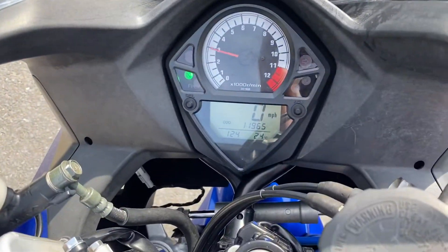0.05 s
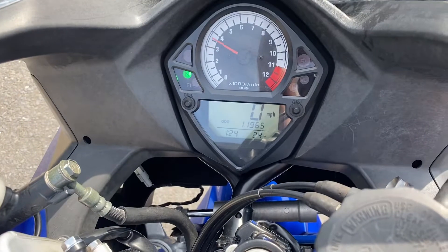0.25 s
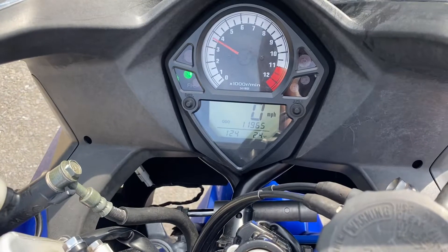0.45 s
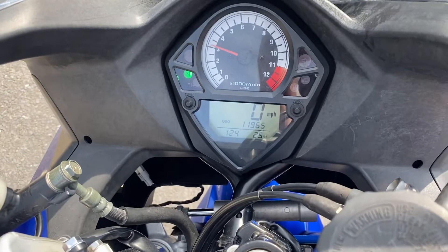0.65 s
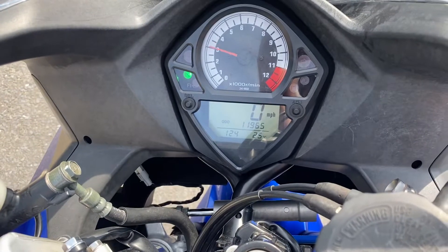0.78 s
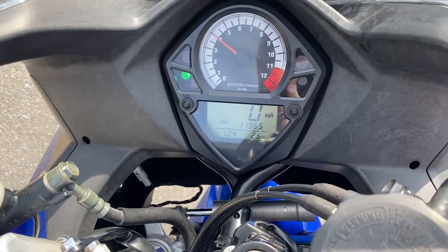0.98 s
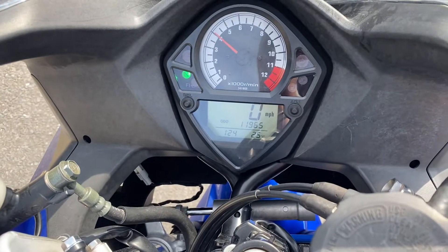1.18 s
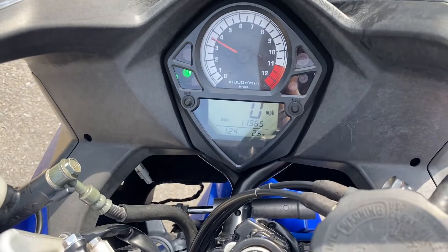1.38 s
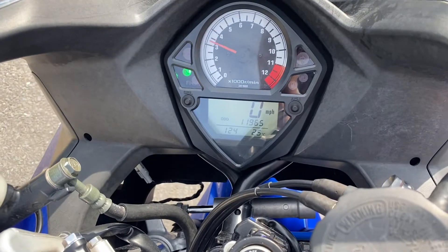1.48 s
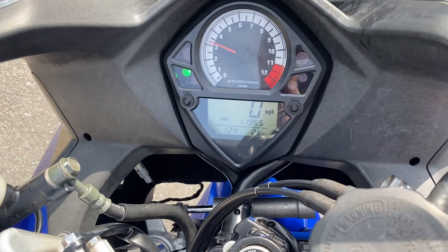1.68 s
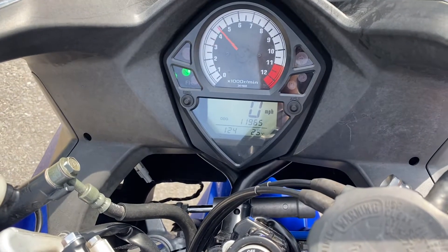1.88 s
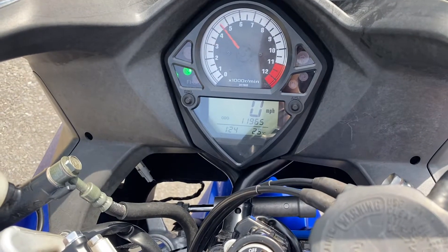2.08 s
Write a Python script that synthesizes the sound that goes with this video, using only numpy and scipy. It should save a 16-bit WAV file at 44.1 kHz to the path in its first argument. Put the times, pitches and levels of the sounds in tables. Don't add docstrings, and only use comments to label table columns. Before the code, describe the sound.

Rough twin-cylinder motorcycle revving in place, lumpy exhaust and honking intake rising and falling twice.

```python
import sys
import numpy as np
from scipy import signal
from scipy.fft import rfft, irfft, next_fast_len
from scipy.io import wavfile
from scipy.ndimage import uniform_filter1d

SR = 44100
rng = np.random.default_rng(int(sys.argv[2]) if len(sys.argv) > 2 else 0)


def generate_wav(sig):
    pcm = np.round(np.clip(np.atleast_2d(sig).T, -1, 1) * 32767).astype(np.int16)
    wavfile.write(sys.argv[1], SR, pcm)


def elevation(decibels):
    levels = np.asarray(decibels, float)
    return 10 ** (levels / 20)


N = 94506
CYCLES = 80


def evened(x):
    return x / np.sqrt(np.mean(x ** 2) + 1e-20)


def smoothed_twice(x, size):
    return uniform_filter1d(uniform_filter1d(x, size=size), size=size)


def read(points, hz):
    f, value = np.transpose(points)
    return np.interp(np.log(hz + 1), np.log(f + 1), value)


def control(rows, column=1):
    rows = np.array(rows)
    curve = np.interp(np.arange(N) / SR, rows[:, 0], rows[:, column])
    return uniform_filter1d(curve, size=600, mode="nearest")


# time in seconds, speed in engine cycles per second.
SPEED = [(0.0, 34.08), (0.08, 33.72), (0.2, 29.3), (0.32, 23.8), (0.43, 20.08), (0.54, 18.2), (0.64, 27.03),
         (0.76, 37.28), (0.83, 36.9), (1.03, 28.36), (1.2, 22.23), (1.3, 20.69), (1.41, 20.63),
         (1.52, 29.33), (1.64, 39.09), (1.73, 40.21), (1.84, 35.95), (2.14, 23.64)]


def engine_speed():
    return control(SPEED)


def turns():
    return np.cumsum(engine_speed()) / SR


def pull():
    full_pull = 12
    rise = np.gradient(engine_speed()) * SR
    return uniform_filter1d(np.clip(rise / full_pull, 0, 1), size=900)


# time in seconds, throttle roar in dB, intake honk in dB.
THROTTLE = [(0, -15, -21.5), (.07, -20, -28), (.22, -22.5, -43), (.45, -29, -50), (.535, -33, -34),
            (.555, -22.5, -38), (.62, -19, -22), (.7, -14, -15), (.78, -15, -20), (.86, -19, -14.5),
            (1.02, -22.5, -32.5), (1.2, -25.5, -45), (1.35, -26.5, -27.5), (1.405, -25.5, -39),
            (1.425, -25, -28), (1.52, -16, -21), (1.7, -13.5, -14.5), (1.82, -19, -15.5),
            (2.04, -25, -35.5)]
SHUT_DB, OPEN_DB = -27, -19


def roar_db():
    return control(THROTTLE)


def honk_db():
    return control(THROTTLE, column=2)


def throttle():
    return np.clip((roar_db() - SHUT_DB) / (OPEN_DB - SHUT_DB), 0, 1)


# pitch in Hz, likeness from 0 to 1.
SAME = [(120, .995), (700, .9), (1500, .45), (3500, .65), (5500, .3), (7500, .6), (8600, .985),
        (16000, .985)]
# pitch in Hz, phase in radians.
LEAD = [(200, .1), (900, .5), (6300, .05), (8550, -3.1), (10000, -6.3), (12100, -9.4), (14200, -12.6),
        (16100, -15.7)]
# pitch in Hz, left over right in dB.
TILT = [(60, -20), (250, -0.5), (1000, 5.5), (2000, 2.5), (4000, 4), (7000, 3.5), (8500, 1.3), (16000, 2)]


def ports(x, other, colour):
    patch_db, patch_top_hz = 2.5, 7000
    hz, _, left = signal.stft(x, SR, nperseg=512)
    stranger = signal.stft(other, SR, nperseg=512)[2]
    same = np.clip(read(SAME, hz), 0, 1)[:, None]
    lag = np.exp(-1j * read(LEAD, hz)) / elevation(read(TILT, hz))
    right = (same * left + np.sqrt(1 - same ** 2) * stranger) * lag[:, None]

    patch = uniform_filter1d(rng.standard_normal(left.shape), size=5, axis=0)
    patch = evened(uniform_filter1d(patch, size=8, axis=1))
    fade = 1 + (hz[:, None] / patch_top_hz) ** 2
    z = np.array([left, right]) * elevation(read(colour, hz)[:, None] + patch_db * patch / fade)
    return evened(signal.istft(z, SR, nperseg=512)[1][:, :N])


# pitch in Hz, level in dB per Hz.
ROAR = [(110, -13), (330, -5), (700, -7), (1600, -7.5), (2600, -19), (5200, -21), (9000, -31), (16000, -47)]
# pitch in Hz, level in dB per Hz.
IDLE = [(110, -10), (330, -5), (850, -9), (1700, -7), (3500, -13.5), (7500, -24), (11000, -49),
        (16000, -33)]
# start in seconds, level in dB.
SNAPS = [
    (0.547, -24),
    (0.601, -15.5),
    (1.421, -16.5),
]


def clatter():
    ticks_per_s, tick_db, tick_spread_db = 540, -2.5, 5
    idle_db, loud_roar_db, roar_slope = -31, -20.5, 0.92
    puff_db, puff_at = 0.5, 0.73
    snap_rise_s, snap_t60 = 0.0034, 0.068

    strength = elevation(tick_db + tick_spread_db * np.minimum(rng.exponential(1, (4, N)), 4))
    ticks = strength * (rng.random((4, N)) < ticks_per_s / SR)
    hiss = rng.standard_normal((4, N)) * (1 + ticks)

    t = np.arange(N) / SR
    snap = np.zeros(N)
    for start, db in SNAPS:
        fall_db = 60 * np.maximum(t - start, 0) / snap_t60
        snap += elevation(db - fall_db) * np.clip((t - start) / snap_rise_s, 0, 1)

    puff = puff_db * np.cos(2 * np.pi * (turns() - puff_at))
    rush = elevation(loud_roar_db + roar_slope * (roar_db() - OPEN_DB) + puff)
    roar = (snap + rush) * ports(hiss[0], hiss[1], ROAR)
    return roar + elevation(idle_db) * ports(hiss[2], hiss[3], IDLE)


# multiple of the tooth rate, level in dB.
WHINE = [(1, 7), (2, -2), (3, -5), (4, -4), (6, -9)]
# pitch in Hz, boost in dB.
CASE = [(800, -8), (1300, -5), (1580, 8), (1850, -2), (2250, 7), (2900, -4), (3500, 3), (4600, -9)]


def whine():
    teeth_per_cycle = 40.93
    level_db, pan_db, flutter_db = -38, 3.5, 2.5
    load_db = -5
    hz = teeth_per_cycle * engine_speed()
    teeth_passed = np.cumsum(hz) / SR
    out = np.zeros((2, N))
    for k, db in WHINE:
        flutter = evened(smoothed_twice(rng.standard_normal((3, N)), 700))
        wander = flutter[0] + 0.5 * flutter[1:]
        load = (k > 1) * load_db * pull()
        level = elevation(db + load + read(CASE, k * hz) + flutter_db * wander)
        out += level * np.sin(2 * np.pi * (k * teeth_passed + 0.13 * flutter[1:]))
    return out * elevation([[level_db + pan_db], [level_db - pan_db]])


# pitch in Hz, level in dB.
HONK = [(480, -16.5), (640, -6), (795, 0.5), (930, -12)]


def gulp(at):
    span, edge, sag_db = 0.42, 0.18, -3
    lump_db, phase_luck = 1.5, 0.15
    run = turns() - at + 1
    cycle = run.astype(int)
    u = run % 1 / span
    since = (run % 1) / engine_speed()
    opening = np.clip(np.minimum(u, 1 - u) / edge, 0, 1)
    gate = np.sin(np.pi / 2 * opening) ** 2 * elevation(sag_db * u)

    luck = rng.standard_normal((CYCLES, 8))
    tone = np.zeros(N)
    for k, (hz, db) in enumerate(HONK):
        phase = hz * since + phase_luck * luck[cycle, k + 4]
        tone += elevation(db + lump_db * luck[cycle, k]) * np.sin(2 * np.pi * phase)
    return gate * tone


def airbox():
    level_db, pan_db = -1.4, 1.8
    near_at, far_at = 0.68, 0.22
    far_db, far_grow_db = -24, 15
    honk = evened(gulp(near_at) + elevation(far_db + far_grow_db * pull()) * gulp(far_at))

    skip_s, skip_len_s, skip_db = 1.74, 0.0053, -26
    skip = skip_db * np.exp(-((np.arange(N) / SR - skip_s) / skip_len_s) ** 4)
    return honk * elevation(level_db + honk_db() + skip) * elevation([[pan_db], [-pan_db]])


def beats(at, lump_db):
    jitter = 0.007
    luck = rng.standard_normal((CYCLES, 2))
    angle = np.arange(CYCLES) + at + jitter * luck[:, 0]
    where = np.interp(angle, turns(), np.arange(N), -1, -1).astype(int)
    heard = where > 0
    out = np.zeros(N)
    out[where[heard]] = elevation(luck[:, 1] * lump_db[where])[heard]
    return out


# pitch in Hz, level in dB.
PIPE = [(30, -28.5), (55, -9), (76, 4), (102, -2.5), (122, -9.5), (185, -19), (350, -38), (2000, -100)]
# time in seconds, level in dB.
EXHAUST = [(0.0, -15), (0.07, -7.5), (0.09, -16.5), (0.16, -10), (0.23, -16), (0.34, -11.5), (0.43, -20),
           (0.74, -9), (0.97, -11.5), (1.04, -15.5), (1.17, -11.5), (1.2, -18.5), (1.36, -12.5),
           (1.39, -23), (1.44, -12), (1.82, -8.5), (2.04, -16.5), (2.14, -11.5)]


def exhaust():
    fire_at, rear_after = 0.066, 0.423
    lump_shut_db, lump_open_db = 2.5, 1.2
    rear_shut_db, rear_open_db = -2.5, -3
    boom_db = -0.15
    o = throttle()
    lump = lump_shut_db + (lump_open_db - lump_shut_db) * o
    rear = elevation(rear_shut_db + (rear_open_db - rear_shut_db) * o)
    fire = beats(fire_at, lump) + rear * beats(fire_at + rear_after, lump)

    gain = np.log(elevation(read(PIPE, abs(np.fft.fftfreq(16384, 1 / SR)))))
    taps = np.fft.ifft(np.exp(np.conj(signal.hilbert(gain)))).real[:8192]
    boom = signal.oaconvolve(fire, taps)[:N]
    boom = boom / np.sqrt(uniform_filter1d(boom ** 2, size=9000) + 1e-12)
    return elevation(boom_db + control(EXHAUST)) * boom


def scene():
    return clatter() + whine() + airbox() + exhaust() * elevation([[-0.2], [0.2]])


def roll_off(x):
    return signal.sosfilt(signal.butter(12, 16110, fs=SR, output="sos"), x)


# pitch in Hz, level in dB.
MIC = [(15, -30), (45, 0), (11000, 0), (12100, -3), (14500, 3), (16000, 4)]


def record(dry):
    soft = np.tanh(dry * 0.85) / 0.81
    size = next_fast_len(N + 8192)
    colour = elevation(read(MIC, np.fft.rfftfreq(size, 1 / SR)))
    finished = irfft(rfft(soft, size) * colour, size)[:, :N]
    return roll_off(finished)


dry = scene()
out = record(dry)
generate_wav(out)
```